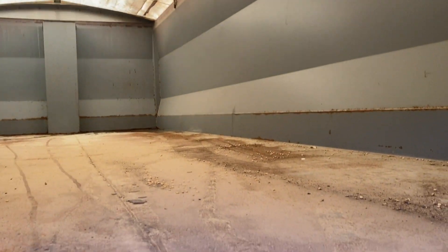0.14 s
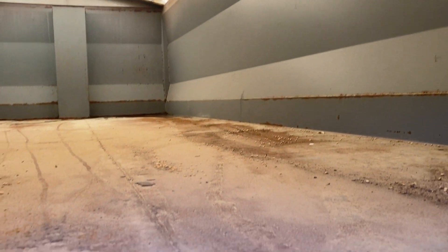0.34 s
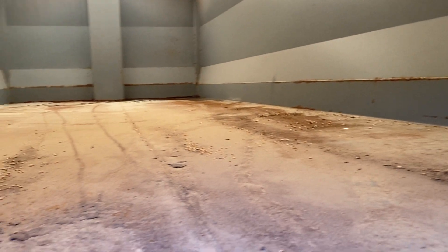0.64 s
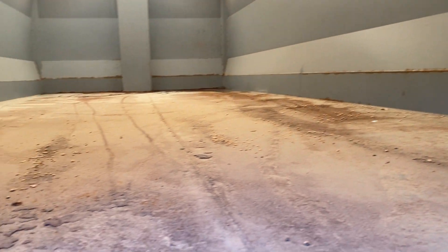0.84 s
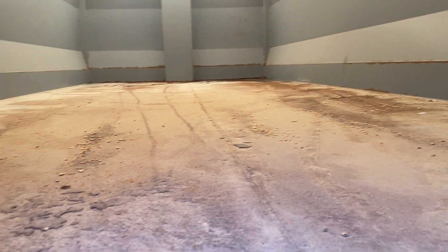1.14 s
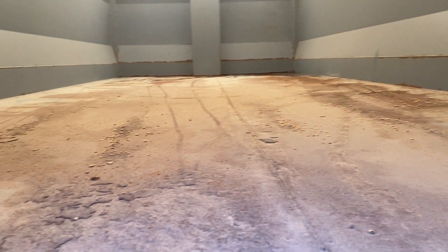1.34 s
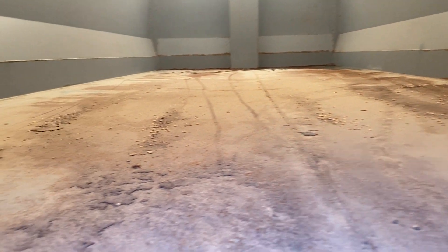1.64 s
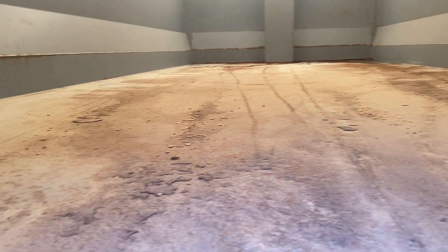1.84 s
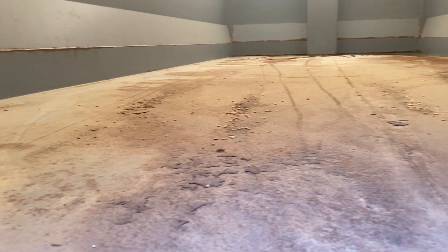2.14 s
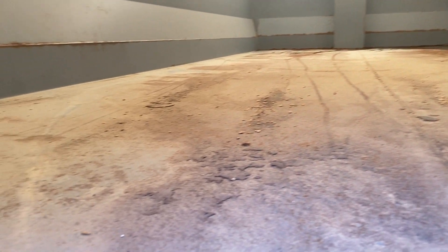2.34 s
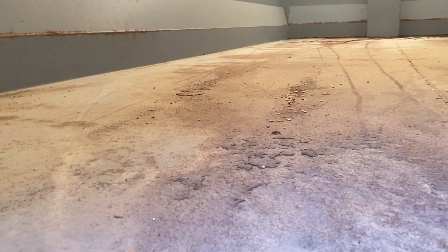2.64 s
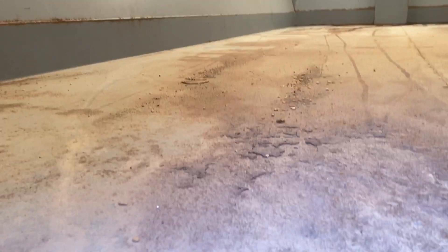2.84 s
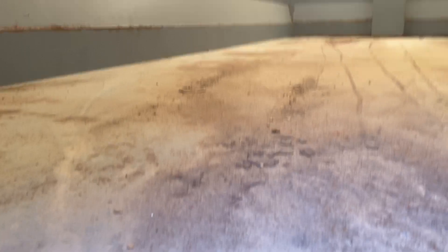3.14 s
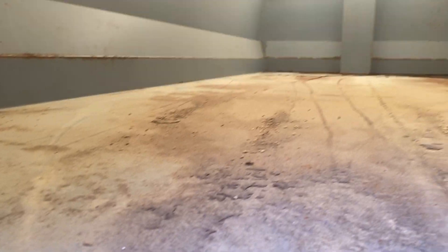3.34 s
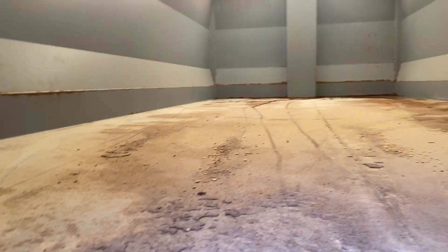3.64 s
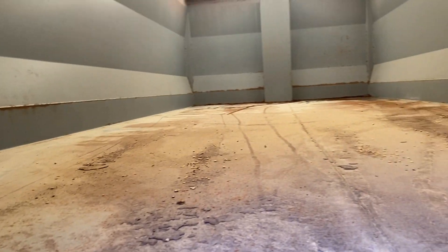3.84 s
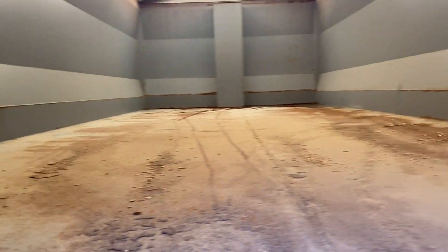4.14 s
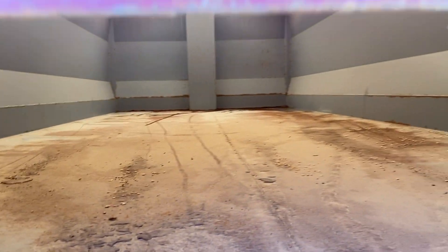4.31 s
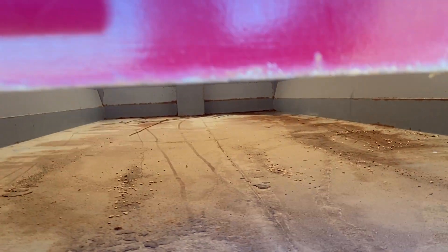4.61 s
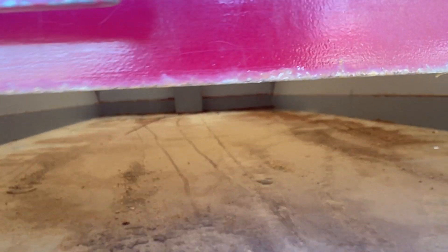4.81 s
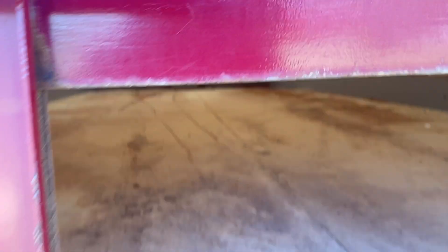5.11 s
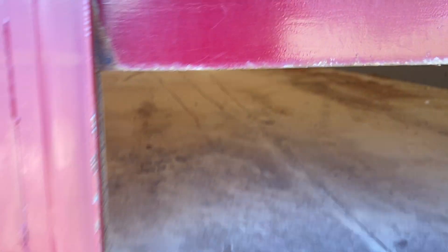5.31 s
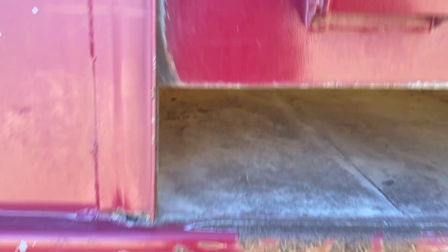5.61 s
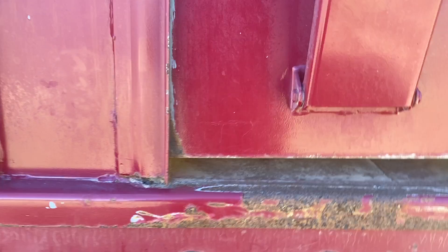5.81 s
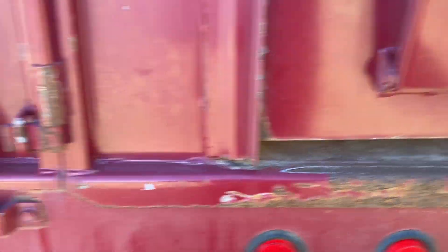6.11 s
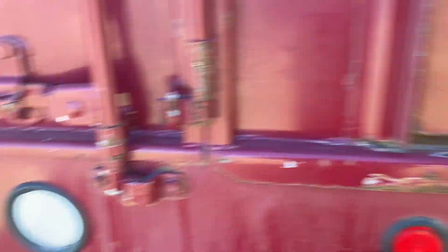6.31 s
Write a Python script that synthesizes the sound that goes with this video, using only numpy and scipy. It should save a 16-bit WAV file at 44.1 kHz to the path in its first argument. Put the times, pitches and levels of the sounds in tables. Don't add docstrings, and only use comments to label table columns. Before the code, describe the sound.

A large idling diesel fills a hollow metal box with boomy, wavering drone and faint gear whine. The handheld microphone is close and roams, so the hum drifts in strength. Soft sheet-metal thuds come now and then. After it passes into the open air, small ticks lead to an abrupt, very loud spurt of compressed air and metal snap, followed by a fading echo, another short puff and final clicks.

```python
import sys
import numpy as np
from scipy import signal
from scipy.fft import rfft, irfft, next_fast_len
from scipy.io import wavfile
from scipy.ndimage import uniform_filter1d, map_coordinates

SR = 44100
rng = np.random.default_rng(int(sys.argv[2]) if len(sys.argv) > 2 else 0)


def wav_out(sig):
    wavfile.write(sys.argv[1], SR, np.round(np.clip(np.atleast_2d(sig).T, -1, 1) * 32767).astype(np.int16))


def level_to_linear(level):
    exponent = np.asarray(level, float) / 20
    return 10 ** exponent


N = 284886


def unit(x):
    return x / np.sqrt(np.mean(x ** 2) + 1e-20)


def along(points, hz):
    f, v = np.transpose(points)
    return np.interp(np.log(hz + 1), np.log(f + 1), v)


def over_time(points):
    s, value = np.transpose(points)
    return np.interp(np.arange(N) / SR, s, value)


def wobble(rate):
    knots = rng.standard_normal(int(N * rate / SR) + 4)
    return map_coordinates(knots, [np.arange(N) * rate / SR])


def filtered(x, response):
    m = next_fast_len(N + SR // 2)
    return irfft(rfft(x, m) * response(np.fft.rfftfreq(m, 1 / SR)), m)[..., :N]


def resonance(f, centre, width):
    return 1j * f * width / (centre ** 2 - f * f + 1j * f * width)


def rush(spectrum, alike, patchy_db, gate=1):
    z = signal.stft(rng.standard_normal((2, N)), nperseg=512)[2]
    field = rng.standard_normal(z.shape[1:])
    field = uniform_filter1d(uniform_filter1d(field, size=6, axis=0), size=14, axis=1)
    pair = signal.istft(z * level_to_linear(patchy_db * unit(field)), nperseg=512)[1][:, :N] * gate

    def colour(hz):
        angle = np.arccos(np.clip(along(alike, hz), -1, 1)) / 2
        return level_to_linear(along(spectrum, hz)) * [np.cos(angle), np.sin(angle)]

    mid, side = filtered(pair, colour)
    return unit(np.array([mid + side, mid - side]))


def tone(turns, db, sway_db, spread):
    apart = spread * wobble(1.6) * np.array([[1], [-1]])
    level = np.sqrt(2) * level_to_linear(db + sway_db * wobble(4.033))
    return level * np.sin(2 * np.pi * (turns + rng.random()) + apart)


# t/s, loudness of the body level/dB
BODY_LOUDNESS = [(0, 1.4), (.95, -0.2), (1.94, -1), (3.07, -3), (3.74, -3), (4.3, -3.5), (4.98, -7),
                 (5.67, -4.5), (5.97, -8), (6.46, -7.5)]


def microphone():
    t = np.arange(N) / SR
    wall_fade_s, leave_s, leave_span_s = 0.24, 4.89, 0.4
    outdoors = np.clip(0.5 + (t - leave_s) / leave_span_s, 0, 1)
    return over_time(BODY_LOUDNESS), np.exp(-t / wall_fade_s), outdoors


# t/s, firing rate f/Hz
IDLE_SPEED = [(0, 39.25), (.17, 39.5), (1.02, 40.14), (1.53, 39.42), (2.1, 39.42), (2.72, 38.8),
              (3.3, 38.3), (3.91, 38.14), (4.42, 38.76), (4.8, 39.23), (5.4, 39.81), (6.46, 39.9)]


def firing_count():
    return np.cumsum(over_time(IDLE_SPEED)) / SR


def firing_gate(firings):
    return 1 + 0.037 * np.cos(2 * np.pi * firings)


def pump_turns(firings):
    return firings * 9.625 / 39.9


# f/Hz, level/dB per Hz
ECHO_COLOUR = [(500, -26.5), (1000, -1), (3000, -8.5), (6000, -12), (8000, -20), (15500, -46)]
# f/Hz, t/s
ECHO_T60 = [(1000, 2.8), (3000, 2.4), (7000, .7)]
# f/Hz, likeness (0-1)
AIR_ALIKE = [(300, .93), (640, .8), (1400, .72), (3100, .86), (6000, .9), (8500, .93), (11500, .998),
             (15000, .99)]


def echo():
    start_s, level_db, rise_s = 5.84, -36, 0.06
    hz, t, z = signal.stft(rush(ECHO_COLOUR, AIR_ALIKE, patchy_db=1.4), SR, nperseg=512)
    after = np.maximum(t - start_s, 0)
    rise = 1 - np.exp(-(after / rise_s) ** 2)
    fall = level_to_linear(level_db - 60 * after / along(ECHO_T60, hz)[:, None])
    return signal.istft(z * rise * fall, SR, nperseg=512)[1][:, :N]


# t/s, peak level/dB, f/Hz
KNOCKS = [(1.925, -23, 580), (3.182, -22, 630), (3.803, -26, 626), (3.912, -23, 623.4), (4.061, -24.5, 610),
          (5.291, -22, 650), (6.262, -21, 334)]


def knocks():
    out, t = np.zeros(N + SR), np.arange(SR // 5) / SR
    for s, db, hz in KNOCKS:
        thud = np.sin(2 * np.pi * hz * t) * level_to_linear(-60 * t / 0.02) * (1 - np.exp(-t / 0.00051))
        out[round(s * SR):][:len(t)] += level_to_linear(db + 6) * thud
    return out[:N]


# t/s, peak level/dB, centre f/Hz, 60 dB decay t/s
CLICKS = [(4.011, -39.5, 4578, 0.015), (4.912, -40, 6990, 0.088), (4.97, -39.5, 3070, 0.049),
          (5.339, -31.5, 4420, 0.11), (5.34, -28.5, 1780, .08), (5.746, -14, 2100, 0.08),
          (5.7596, -8.5, 8800, .03), (5.761, -8.5, 3430, 0.09), (5.762, -16, 1808, 0.11),
          (5.767, -11.5, 7010, .02), (5.77, -13.5, 455, 0.17), (6.216, -45.5, 7470, 0.039),
          (6.218, -27.5, 1100, 0.15), (6.352, -27.5, 3510, .16), (6.425, -20, 7190, 0.027),
          (6.428, -27.5, 3520, .08)]


def clicks():
    out, t = np.zeros(N + SR), np.arange(SR // 5) / SR
    f = np.fft.rfftfreq(len(t), 1 / SR)
    for s, db, hz, t60 in CLICKS:
        skirt = 0.12 * np.exp(-np.log((f + 1) / hz) ** 2 / 0.55)
        peak = np.exp(-((f - hz) / (0.42 * hz)) ** 2)
        crack = unit(irfft(rfft(rng.standard_normal(len(t))) * (skirt + peak), len(t)))
        ring, snap = level_to_linear(db - 6 - 60 * t / t60), level_to_linear(db - 8 - 60 * t / 0.005)
        out[round(s * SR):][:len(t)] += (ring + snap) * crack
    return out[:N]


# f/Hz, width f/Hz, level/dB
HATCH = [(1033, 19, 2), (2100, 250, 0.5), (3410, 300, 5), (3780, 60, -3.5), (4130, 69, -2),
         (6650, 140, -5.5), (6760, 90, 4.5), (7340, 100, -10)]


def through_hatch(noise):
    def plate(f):
        return 1 + sum(level_to_linear(db) * resonance(f, hz, width) for hz, width, db in HATCH)
    return unit(filtered(noise, plate))


# full flow from t/s, to t/s, opening slope/dB per s, hiss level/dB, jet level/dB
PUFFS = [(4.978, 5.836, 650, -49, -47.5), (5.003, 5.035, 298, -51, -38.5), (5.352, 5.344, 401, -49, -38.5),
         (5.708, 5.794, 164.5, -34.5, -19), (5.768, 5.755, 1503, -26.5, -11.5),
         (5.606, 5.703, 60.5, -52, -41), (6.214, 6.221, 700, -58.5, -48), (6.356, 6.425, 748, -39, -33)]
# f/Hz, level/dB per Hz
HISS_COLOUR = [(1800, -37), (3000, -10), (4500, -6), (6000, -7), (6830, -8), (8000, -2.5), (9700, -3),
               (11000, -10), (13000, -9), (14900, -8), (15700, -16.5)]
# f/Hz, level/dB per Hz
JET_COLOUR = [(150, -36), (300, 2.5), (500, 1.5), (900, -1.5), (1500, -2.5), (2100, -6), (2700, -6),
              (3500, -13), (5000, -14.5), (8000, -24), (11000, -25), (15500, -41)]


def air():
    t = np.arange(N) / SR
    closing_db_per_s = 327
    flows = []
    for start, end, opening_db_per_s, *_ in PUFFS:
        opening_db = -opening_db_per_s * np.maximum(start - t, 0)
        closing_db = -closing_db_per_s * np.maximum(t - end, 0)
        flows.append(level_to_linear(opening_db + closing_db) ** 2)
    levels = np.transpose(PUFFS)[3:]
    hiss_gain, jet_gain = np.sqrt(level_to_linear(levels) ** 2 @ flows)
    hiss = rush(HISS_COLOUR, AIR_ALIKE, patchy_db=2.1, gate=level_to_linear(1.7 * wobble(550)))
    jet = rush(JET_COLOUR, AIR_ALIKE, patchy_db=0.8, gate=level_to_linear(2 * wobble(600)))
    return hiss_gain * level_to_linear(6.5) * through_hatch(hiss) + jet_gain * level_to_linear(1.13) * through_hatch(jet)


# f/Hz, level/dB per Hz
OUTSIDE_COLOUR = [(300, -30.5), (600, -2), (1070, -5.5), (5000, -23), (7800, -36.5), (9400, -37),
                  (15500, -43)]


def engine_outside():
    outdoors = microphone()[2]
    fade_start_s, fade_db_per_s = 6.06, -22
    fade_db = fade_db_per_s * np.maximum(np.arange(N) / SR - fade_start_s, 0)
    return outdoors * level_to_linear(-39 + fade_db) * rush(OUTSIDE_COLOUR, AIR_ALIKE, patchy_db=3.5)


def clatter_level():
    depth_db, wall, outdoors = microphone()
    return -43.5 + depth_db + outdoors + 2.5 * wall


# f as a multiple of firing rate, level/dB over clatter
WHINE = [(53.2, -10), (54.2, -16.5), (55.2, -18), (56.2, -13), (57.2, -7), (58.1, -10), (59.1, -22),
         (60.1, -18.5)]


def gear_whine(firings):
    outdoors = microphone()[2]
    level_db = clatter_level() - 3 - 6 * outdoors
    whine = 0
    for multiple, db in WHINE:
        turns = multiple * firings + 0.07 * wobble(8.2) + 0.079 * wobble(45)
        whine = whine + tone(turns, level_db + db, sway_db=4.5, spread=0.45)
    return filtered(whine, lambda f: resonance(f, centre=2235, width=230) ** 2)


# f/Hz, likeness (0-1)
ENGINE_ALIKE = [(40, 1), (70, 0.97), (130, 0.89), (290, 0.99), (640, 0.67), (1400, 0.39), (3100, 1),
                (6000, 0.24), (8000, 0.75), (15000, 0.84)]
# f/Hz, level/dB per Hz
CLATTER_COLOUR = [(700, -32), (1100, 0), (1400, -5), (2000, -8), (2230, -4.5), (2480, -11.5), (5200, -23),
                  (7300, -34.5), (9800, -38.5), (10800, -54), (11600, -74.5), (15000, -75.5)]


def clatter(firings):
    noise = rush(CLATTER_COLOUR, ENGINE_ALIKE, patchy_db=0.5, gate=firing_gate(firings))
    return level_to_linear(clatter_level()) * noise


# f/Hz, level/dB per Hz
ROAR_COLOUR = [(15, -42.5), (25, -7), (71, -16.5), (119, -12.5), (165, -6.5), (198, -12.5), (218, -8.5),
               (344, -17.5), (470, -19.5), (703, -29), (785, -26), (996, -31), (1070, -33.5), (1440, -42.5),
               (2000, -56.5), (2600, -78.5), (4400, -120)]


def roar(firings):
    depth_db = microphone()[0]
    noise = rush(ROAR_COLOUR, ENGINE_ALIKE, patchy_db=0.5, gate=firing_gate(firings))
    return level_to_linear(-20 + depth_db + 0.17 * wobble(7.7)) * noise


# f as a multiple of the engine cycle, and level/dB of each
CYCLE_ORDERS = [7, 9, 10, 11, 13, 18, 22, 23, 25, 26, 30, 33, 36, 42, 45, 60, 72, 76]
CYCLE_DB = [-35.5, -35, -32, -43, -36, -31, -39, -46, -42, -32.5, -49.5, -39.5, -37, -46.5, -46, -48.5,
            -45.5, -43]
# f as a multiple of the pump shaft, and level/dB of each
SHAFT_ORDERS = [8, 9.5, 11, 19, 21, 22, 23, 26, 31, 40, 48, 50]
SHAFT_DB = [-42, -35.5, -49, -31, -25, -32, -32.5, -33.5, -48, -46.5, -49.5, -46]


def weak_hum(firings):
    _, wall, outdoors = microphone()
    cycles, shaft = firings / 6, pump_turns(firings)
    weak = [(order * cycles, db) for order, db in zip(CYCLE_ORDERS, CYCLE_DB)]
    weak += [(order * shaft, db) for order, db in zip(SHAFT_ORDERS, SHAFT_DB)]
    level_db = -2.5 - 9.5 * outdoors + 4.5 * wall
    return sum(tone(turns, db + level_db, sway_db=4.0, spread=0.31) for turns, db in weak)


# level/dB, growth with body loudness (dB per dB), change in the open level/dB
STRONG = [
    (-28, 1.4, 5),
    (-25.5, .9, 1),
    (-19.5, 0.81, -2.5),
    (-38.5, 0.16, 5.5),
    (-18.5, .4, 0),
    (-19.5, 0.28, -17),
    (-21, 0.48, -1),
    (-33.5, 1.7, -11.5),
]
PHASE_SWAY = [.02, .3, .12, .25, .3, .12, .12, .2]
# t/s, half-width t/s, level/dB
FIRING_SPOTS = [
    [(1.72, .08, -5), (2.72, 0.27, -10.5), (4.3, 0.096, -4)],
    [(1.5, 0.076, 3.5), (2.04, 0.058, -11.5), (2.85, .1, -11), (3.1, .1, 7), (3.75, 0.27, -6.5),
     (4.93, .1, 5.5), (5.5, 0.068, 1.5), (6.29, 0.044, -5)],
    [(1.45, 0.39, 2.5), (2.82, 0.068, -5.5), (3.23, 0.033, -5.5), (4.42, 0.09, -12), (4.9, 0.11, 6.5),
     (5.3, .1, 0), (6, 0.14, -4.5)],
    [(.3, .08, 0.5), (4.93, 0.23, -13), (5.5, 0.13, -2)],
]
# t/s, half-width t/s, level/dB
PUMP_SPOTS = [
    [(.55, 0.084, 3.5), (1.02, 0.061, -7), (1.48, .17, -18), (2.48, 0.073, -13), (2.82, 0.11, 4.5),
     (3.25, 0.072, -6), (4.55, 0.098, 3.5), (5.7, 0.3, -12)],
    [(.02, 0.06, 5), (.36, 0.1, -10.5), (2.4, 0.13, 4), (2.97, 0.099, 4.5), (3.17, .05, -3.5),
     (3.57, .06, -9), (3.75, 0.058, 2), (4.25, 0.25, -3.5), (4.7, 0.067, 4.5), (5.1, .12, 17.5)],
    [(1.04, 0.31, 9.5), (2.05, 0.063, -2.5), (2.25, 0.065, 3), (2.75, 0.046, -3), (3.35, 0.092, -2.5),
     (3.87, 0.11, -9), (4.7, 0.14, -14.5), (5.75, 0.13, -4)],
    [(1.87, 0.17, -15), (3.35, 0.6, 10.5), (3.4, 0.049, -8), (4.9, 0.23, -12)],
]


def strong_hum(firings):
    t, shaft = np.arange(N) / SR, pump_turns(firings)
    depth_db, _, outdoors = microphone()
    sources = [k * firings for k in (1, 2, 4, 8)] + [k * shaft for k in (10, 20, 24, 30)]
    hum = 0
    for turns, strength, spread, spots in zip(sources, STRONG, PHASE_SWAY, FIRING_SPOTS + PUMP_SPOTS):
        db, grows, open_db = strength
        level_db = db + grows * depth_db + open_db * outdoors
        for s, width, swell_db in spots:
            level_db = level_db + swell_db * np.exp(-np.abs((t - s) / (1.71 * width)) ** 4.6)
        hum = hum + tone(turns, level_db, sway_db=0.2, spread=spread)
    return hum


# t/s, left minus right level/dB
HAND_TURN = [(0.0, 1.5), (1.53, 0.5), (2.05, 1), (2.57, -1.5), (2.82, 0), (3.29, -0.5), (4.68, 0.5),
             (5.56, -0.5), (6.46, -1)]


def scene():
    firings = firing_count()
    engine = strong_hum(firings) + weak_hum(firings)
    engine = engine + roar(firings) + clatter(firings) + gear_whine(firings) + engine_outside()
    lean = level_to_linear(over_time(HAND_TURN) * np.array([[0.5], [-0.5]]))
    return engine * lean + air() + clicks() + knocks() + echo()


# f/Hz, level/dB
WHISTLE = [(11770, -81), (12230, -80)]


def whistle():
    t = np.arange(N) / SR
    depth_db, _, outdoors = microphone()
    total = 0
    for hz, db in WHISTLE:
        level = level_to_linear(db + 0.8 * depth_db + 3.8 * wobble(110))
        total = total + level * np.sin(2 * np.pi * (hz * t + 0.15 * wobble(90)))
    return (1 - outdoors) * total


# f/Hz, left minus right level/dB
PORT_LEAN = [(60, 1), (110, 0), (200, -0.5), (380, -1.5), (700, -1.5), (1290, -1.5), (2380, 2), (4400, 2),
             (8120, 0.5), (15000, -0.5)]
# f/Hz, phase/radians
PORT_LEAD = [(0, 0), (1890, -.3), (2930, .9), (5000, .6), (6800, -.2), (8650, -3.14), (9800, -6.1),
             (10600, -6.6), (11700, -9.1), (12400, -9.7), (13400, -12.1), (14400, -12.8), (15500, -15)]


def ports(hz):
    half = np.array([[0.5], [-0.5]])
    lead_hz, lead = np.transpose(PORT_LEAD)
    dip_db = -16 * np.exp(-((hz - 12020) / 420) ** 4)
    return level_to_linear(along(PORT_LEAN, hz) * half + dip_db) * np.exp(1j * half * np.interp(hz, lead_hz, lead))


def roll_off(x):
    return signal.sosfilt(signal.butter(12, 15800, fs=SR, output="sos"), x)


def record(dry):
    dry = dry * np.minimum(np.arange(N) / (0.004 * SR), 1)
    low_cut_hz, top_hz = 31.5, 15750
    x = filtered(dry, lambda hz: ports(hz) / (1 + (low_cut_hz / (hz + 1)) ** 9) * (hz < top_hz))
    x = x + whistle()
    x = x / (1 + np.abs(x / 1.025) ** 8) ** (1 / 8)
    return roll_off(x)


dry = scene()
out = record(dry)
wav_out(out)
```